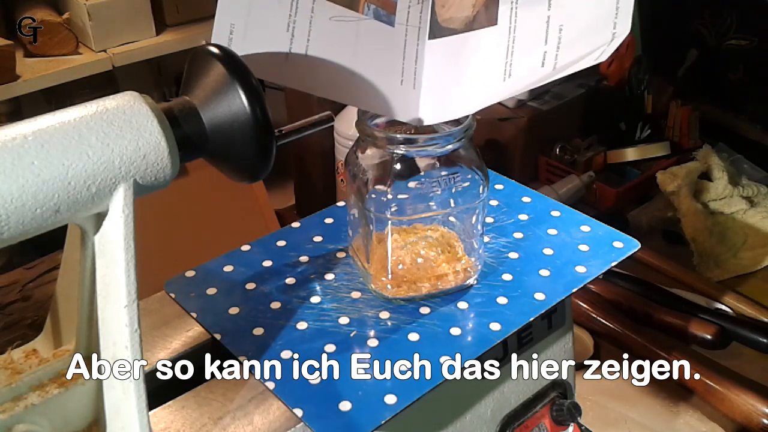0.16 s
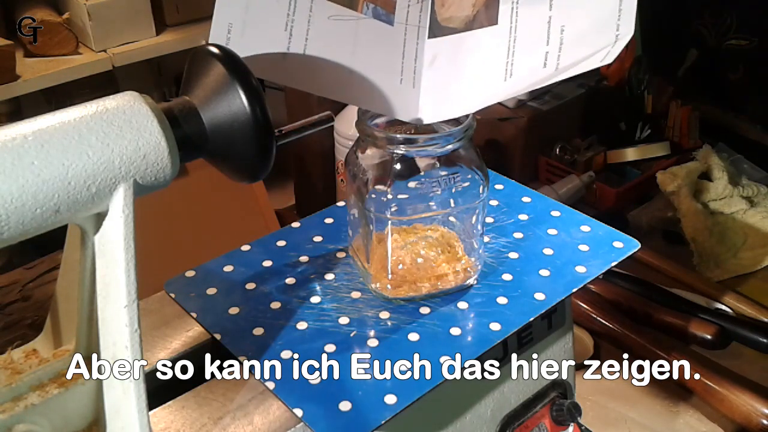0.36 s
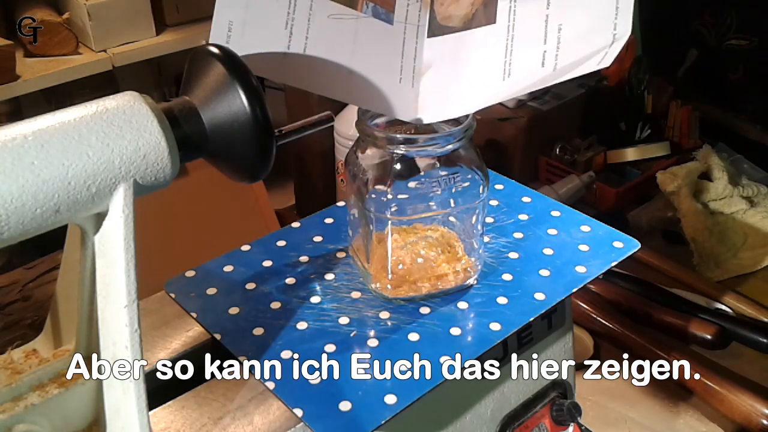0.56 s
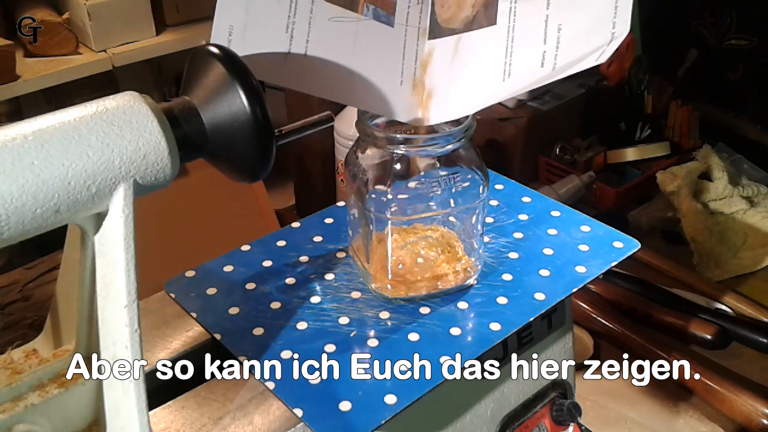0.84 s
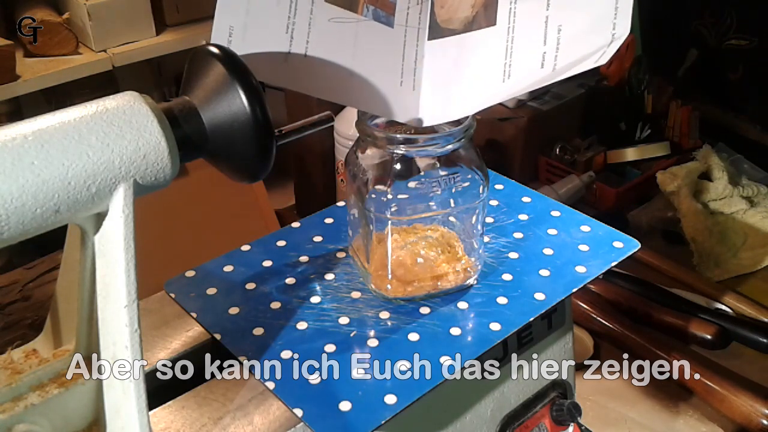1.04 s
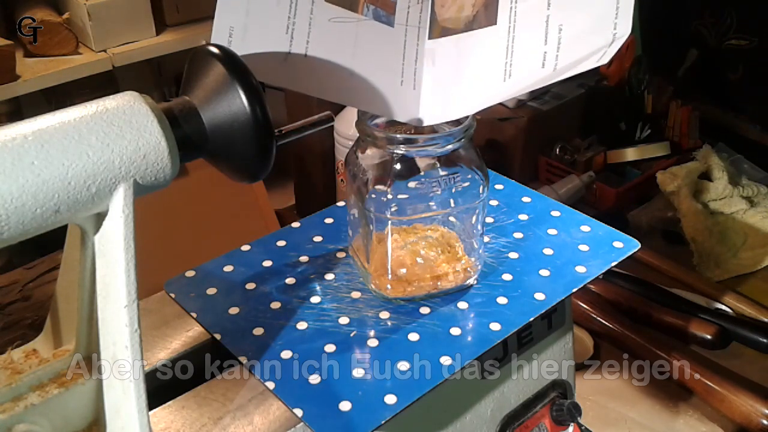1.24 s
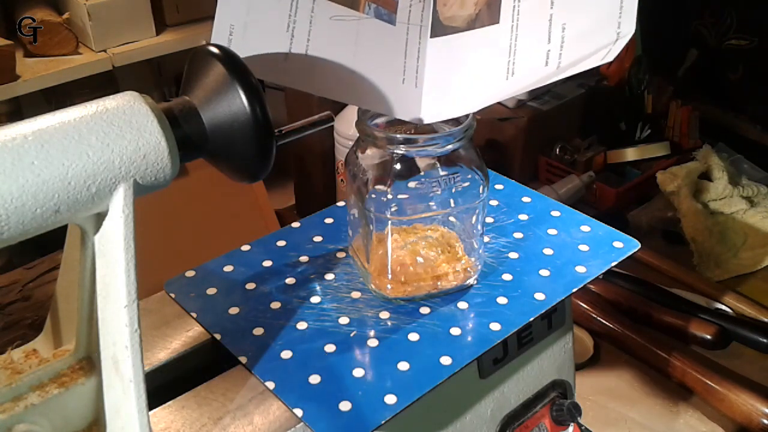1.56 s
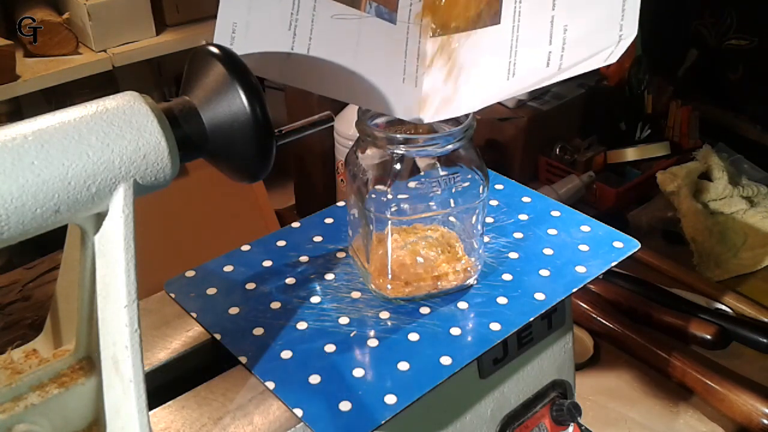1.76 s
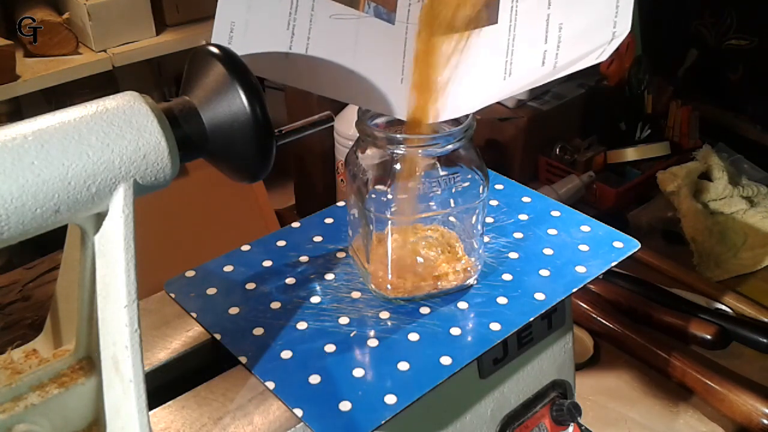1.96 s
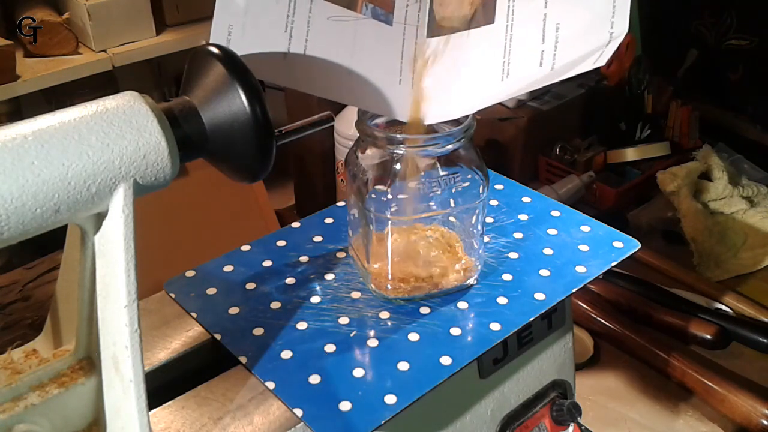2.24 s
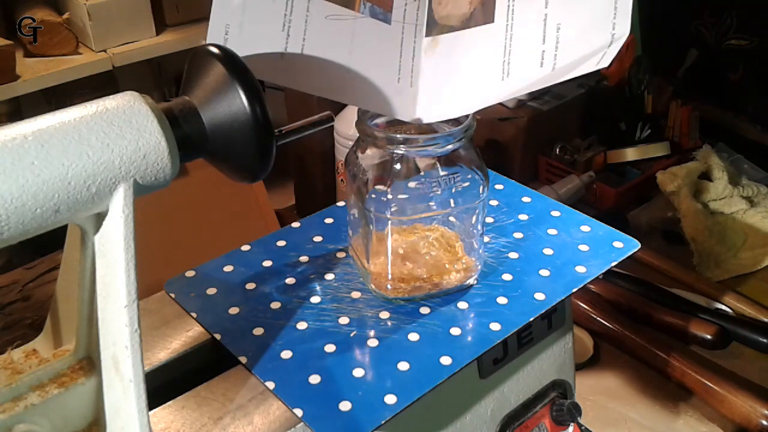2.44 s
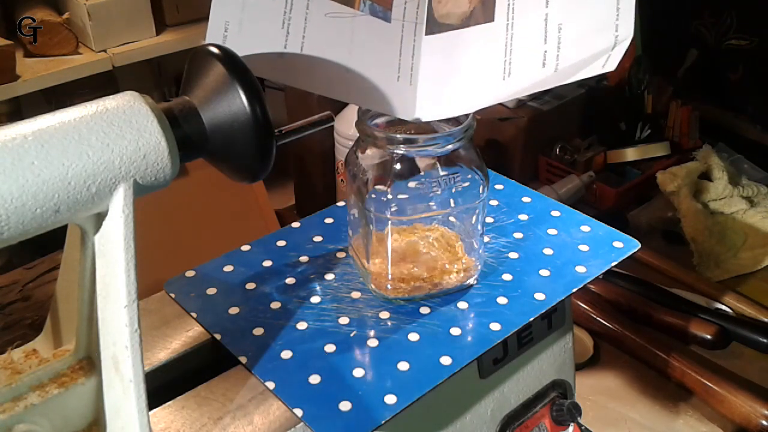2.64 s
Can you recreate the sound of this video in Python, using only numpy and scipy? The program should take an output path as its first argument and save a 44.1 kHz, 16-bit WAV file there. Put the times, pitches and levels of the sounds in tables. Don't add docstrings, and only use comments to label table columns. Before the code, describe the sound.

Close up in a quiet workshop, brittle flakes fall into a glass jar, first ticking singly, then spilling briefly, nearly pausing, pouring strongly with a bright grainy hiss, and ending in a few snaps and ticks.

```python
import sys
import numpy as np
from scipy import signal
from scipy.fft import rfft, irfft
from scipy.io import wavfile

SR = 44100
rng = np.random.default_rng(int(sys.argv[2]) if len(sys.argv) > 2 else 0)


def voltage_ratio(level):
    return 10 ** (np.asarray(level, float) / 20)


def dump_mix(stems):
    frames = np.atleast_2d(stems).T
    limited = np.clip(frames, -1, 1)
    pcm = np.round(limited * 32767).astype(np.int16)
    wavfile.write(sys.argv[1], SR, pcm)


N = 123479

FULL_FLOW_DB = -23.5


def rms_one(x):
    return x / np.sqrt(np.mean(x ** 2) + 1e-20)


def at_hz(points, hz):
    table = np.array(points)
    return np.interp(np.log(hz), np.log(table[:, 0]), table[:, 1])


def filtered(x, order, hz, kind="low"):
    return signal.sosfilt(signal.butter(order, hz, kind, fs=SR, output="sos"), x)


def drift(rate_hz):
    r = np.exp(-2 * np.pi * rate_hz / SR)
    noise = rng.standard_normal(N + SR)
    settled = signal.lfilter([1], [1, -2 * r, r * r], noise)[SR:]
    return rms_one(settled)


def ring(strikes, hz, t60_s):
    r = voltage_ratio(-60 / (t60_s * SR))
    w = 2 * np.pi * hz / SR
    return signal.lfilter([0, np.sin(w)], [1, -2 * r * np.cos(w), r * r], strikes + 1e-18)


def resonance(x, hz, width_hz):
    r = np.exp(-np.pi * width_hz / SR)
    feedback = [1, -2 * r * np.cos(2 * np.pi * hz / SR), r * r]
    return signal.lfilter([(1 - r * r) / 2, 0, (r * r - 1) / 2], feedback, x)


def coloured(spectrum):
    hz = np.arange(N // 2 + 1) * SR / N
    hz = np.clip(hz, spectrum[0][0] / 2, spectrum[-1][0])
    noise = rfft(rng.standard_normal(N))
    return rms_one(irfft(noise * voltage_ratio(at_hz(spectrum, hz)), N))


def contacts(per_s):
    spread_db, biggest = 2.9, 3.8
    sizes = voltage_ratio(spread_db * np.minimum(rng.exponential(1, N), biggest))
    signs = rng.choice([-1, 1], N)
    return sizes * signs * (rng.random(N) < per_s / SR)


def flakes(hits):
    # hz, level_db (per Hz)
    flake_colour = [(120, -46), (200, -79), (495, -55), (707, -33), (1120, -11.5), (3150, -6.5),
                    (5960, -5.5), (10900, -13.5), (14000, -70)]
    # pitch_hz, width_hz, level_db
    jar_air = [(285.5, 15, -5), (500, 37, -2.5), (1085, 190, -11.5), (1520, 63, -8.5), (2270, 370, -10),
               (3550, 190, -18.5), (4810, 900, -18.5), (5875, 990, -7.5)]
    grain_cycles = 8.6
    lot = np.round(27 * rng.random(N) ** 0.64) - 2
    out = np.zeros(N)
    for k, hz in enumerate(np.geomspace(260, 13000, 24)):
        own_hits = hits * (np.abs(lot - k) < 3)
        out += voltage_ratio(at_hz(flake_colour, hz)) * hz / 6000 * ring(own_hits, hz, grain_cycles / hz)
    air = sum(3 * voltage_ratio(db) * resonance(out, hz, width_hz) for hz, width_hz, db in jar_air)
    return out + air


def stream(flow_db):
    full_per_s, fewest_per_s = 14000, 790
    rate_follows = 0.42
    clump_db, surge_db, stream_db = 0.5, 1.2, 0.25
    mean_rate = full_per_s * voltage_ratio(2 * rate_follows * (flow_db - FULL_FLOW_DB))
    mean_rate = np.maximum(mean_rate, fewest_per_s)
    rate = mean_rate * voltage_ratio(clump_db * drift(45) + surge_db * drift(14))
    hits = contacts(rate) * voltage_ratio(flow_db) / np.sqrt(mean_rate)
    sound = flakes(hits)
    body = filtered(sound, 1, 1070)
    body_db = 0.38 * np.clip(FULL_FLOW_DB - 13.5 - flow_db, -12, 15)
    sound = sound + (voltage_ratio(body_db) - 1) * body
    scale = np.sqrt(np.mean(voltage_ratio(flow_db) ** 2) / np.mean(sound ** 2))
    return hits * scale, voltage_ratio(stream_db) * scale * sound


def lumps():
    # start_s, peak_db, pitch_hz, scatter_s
    landings = [(0.0755, -35, 6290, 0.01), (0.1028, -38, 1520, 0.013), (0.1185, -37.5, 4630, 0.015),
                (0.1445, -42, 6300, 0.017), (0.1925, -36, 5800, 0.021), (0.2082, -48, 6050, 0.0057),
                (0.2435, -40, 6000, 0.0052), (0.311, -29, 5700, 0.0085), (0.3643, -33.5, 5590, 0.01),
                (0.3767, -28, 2780, 0.012), (0.416, -27, 2800, 0.0087), (0.4978, -32, 5880, 0.015),
                (0.5062, -19.5, 2580, 0.0072), (0.548, -23, 5560, 0.011), (0.609, -27, 2260, 0.01),
                (0.6231, -16, 2360, 0.026), (0.6823, -16.5, 1520, 0.0072), (0.9973, -18, 5680, 0.0042),
                (1.0632, -18.5, 2000, 0.017), (1.0917, -20.5, 3900, 0.004), (1.1465, -16, 1570, 0.01),
                (1.5304, -41, 1560, 0.004), (1.5553, -26, 5800, 0.0055), (1.6214, -27.5, 6040, 0.012),
                (1.6357, -24, 5370, 0.015), (1.6888, -19, 2620, 0.036), (2.5274, -12.5, 5540, 0.004),
                (2.598, -20, 6100, 0.018), (2.7718, -28, 6310, 0.004), (2.7904, -27, 5700, 0.0073)]
    tone_cycles, tone_db = 10, -7
    crumbs_per_s, scatter_db = 2500, -10.5
    tick_db, lump_db, thud_db = 5.5, -0.5, 1
    first, tone, trail = np.zeros(N), np.zeros(N), np.zeros(N)
    after = np.arange(SR // 5)
    for start_s, db, hz, scatter_s in landings:
        i = int(start_s * SR)
        here = after[:N - i]
        end = i + len(here)
        first[i] = voltage_ratio(db)
        tone[i:end] += ring(voltage_ratio(db + tone_db) * (here == 0), hz, tone_cycles / hz)
        trail[i:end] += voltage_ratio(db + scatter_db) * np.exp(-here / (scatter_s * SR))
    crumbs = flakes(trail * contacts(crumbs_per_s))
    tick = filtered(first, 2, [1500, 8500], "band")
    thud = filtered(trail * rng.standard_normal(N), 2, [248, 1300], "band")
    return voltage_ratio(tick_db) * tick + voltage_ratio(lump_db) * (tone + crumbs) + voltage_ratio(thud_db) * thud


def snaps():
    # start_s, peak_db, pitch_hz
    breaks = [(1.0965, -18, 3800), (1.188, -26, 2500), (1.213, -27, 4400), (1.3389, -12, 5200),
              (1.531, -23, 1550), (1.445, -18, 5000), (1.5544, -23, 5800), (2.5716, -17, 2500),
              (2.6, -18, 3000), (2.643, -25, 6000), (2.681, -33, 6600), (2.7297, -34, 4000),
              (2.748, -37, 4500)]
    cycles = 6
    at = np.arange(N)
    out = np.zeros(N)
    for start_s, db, hz in breaks:
        out += ring(voltage_ratio(db) * (at == int(start_s * SR)), hz, cycles / hz)
    return out


def glass(hits):
    # pitch_hz, level_db, t60_s
    wall_tones = [(2374, -16, .2), (3822, -1, .2), (4269, -14, .15), (5674, 0, .17), (7950, -10, .06),
                  (10470, -15, .07)]
    # start_s, level_db
    rim_hits = [
        (.9985, -29),
        (1.287, -37),
    ]
    stream_share_db = -40
    start_s, db = np.transpose(rim_hits)
    out = np.zeros(N)
    for hz, level_db, t60_s in wall_tones:
        strikes = voltage_ratio(stream_share_db) * hits
        strikes[(start_s * SR).astype(int)] += voltage_ratio(db + rng.normal(0, 1, len(start_s)))
        out += voltage_ratio(level_db) * ring(strikes, hz, t60_s)
    return out


def microphone(x):
    x = filtered(x, 3, 177, "high")
    x = filtered(x, 2, 10650)
    return filtered(x, 10, 14200)


def workshop(x):
    t60_s, wall_cut_hz, spot_s = 0.11, 18000, 0.045
    t = np.arange(SR // 3) / SR
    turns = np.arange(0, N / SR + 1, spot_s)
    spot = rng.integers(0, 6, len(turns))
    out = np.zeros(N)
    for k in range(6):
        tail = rng.standard_normal(len(t)) * voltage_ratio(-60 * t / t60_s)
        tail = filtered(tail * np.clip(t / 0.0011, 0, 1), 1, wall_cut_hz)
        share = np.sqrt(np.interp(np.arange(N) / SR, turns, spot == k))
        out += signal.fftconvolve(share * x, tail / np.sqrt(np.sum(tail ** 2)))[:N]
    return out


def bench_rumble(flow_db):
    # hz, level_db (per Hz)
    rumble_colour = [(18, -48), (30, -14), (80, 2), (97, 6), (140, -5), (200, 1), (260, -47), (440, -120)]
    level_db = -55 + 0.31 * (flow_db - FULL_FLOW_DB) + 0.85 * drift(5.4)
    return voltage_ratio(level_db) * coloured(rumble_colour)


def room_hum():
    # hz, level_db (per Hz)
    hum_colour = [(24, -21), (40, -9), (138, -3.5), (211, 0), (1260, -15), (1390, -32), (11100, -8),
                  (13300, -4), (15000, -5)]
    return voltage_ratio(-62.5) * coloured(hum_colour)


def scene():
    # start_s, level_db
    flow = [(.29, -71.5), (0.478, -52), (0.611, -43.5), (0.759, -28.5), (.92, -30), (.97, -34), (1.1, -38),
            (1.134, -43.5), (1.28, -46), (1.288, -35.5), (1.52, -39), (1.602, -51.5), (1.676, -38),
            (1.8, -23), (2.119, -22.5), (2.591, -36.5), (2.685, -54.5), (2.8, -53.5)]
    room_db = -7
    flow_db = np.interp(np.arange(N) / SR, *np.transpose(flow))
    hits, pour = stream(flow_db)
    jar = microphone(pour + lumps() + snaps() + glass(hits))
    mix = jar + voltage_ratio(room_db) * workshop(jar) + bench_rumble(flow_db) + room_hum()
    return mix[None]


def band_limit(x):
    return signal.sosfilt(signal.butter(12, 15560, fs=SR, output="sos"), x)


def record(dry):
    # start_s, end_s, below_hz
    bass_drops = [
        (1.804, 1.865, 129.6),
        (1.91, 2.227, 158),
    ]
    bass_loss_db, fade_s = -19, 0.015
    t = np.arange(N) / SR
    out = dry - 0.0006
    for start_s, end_s, hz in bass_drops:
        bass = signal.sosfiltfilt(signal.butter(6, hz, fs=SR, output="sos"), out)
        shut = np.clip(np.minimum(t - start_s, end_s - t) / fade_s, 0, 1)
        out = out - (1 - voltage_ratio(bass_loss_db)) * shut * bass
    return band_limit(out)


dry = scene()
out = record(dry)
dump_mix(out)
```